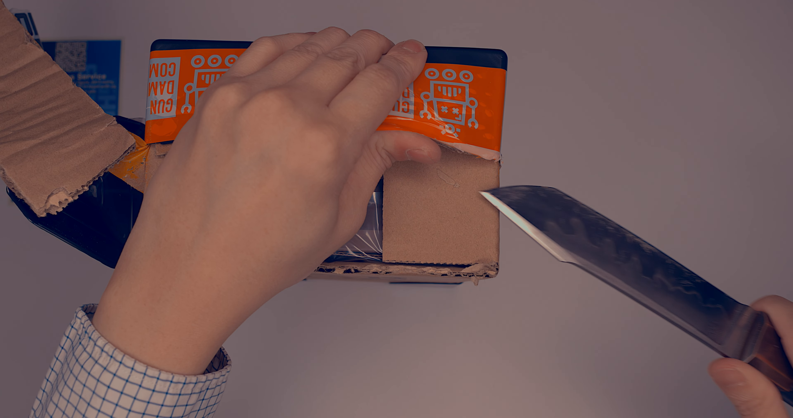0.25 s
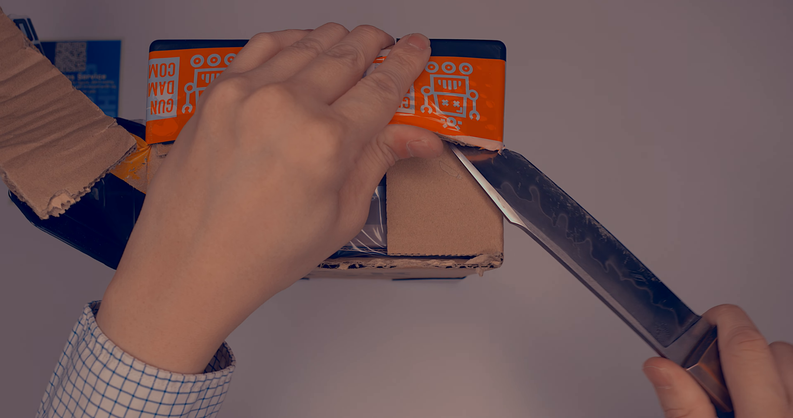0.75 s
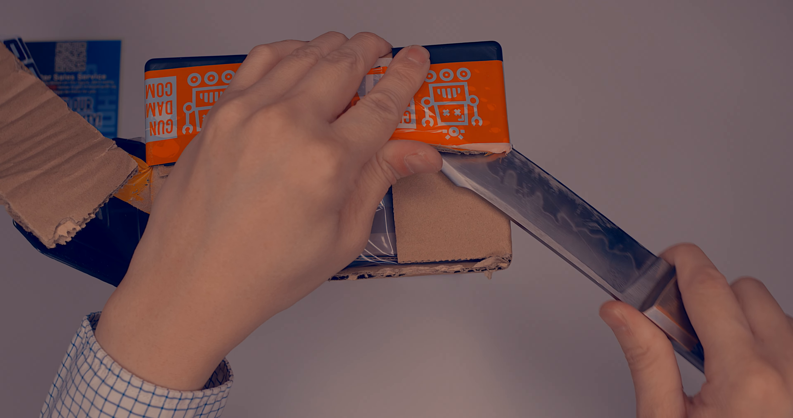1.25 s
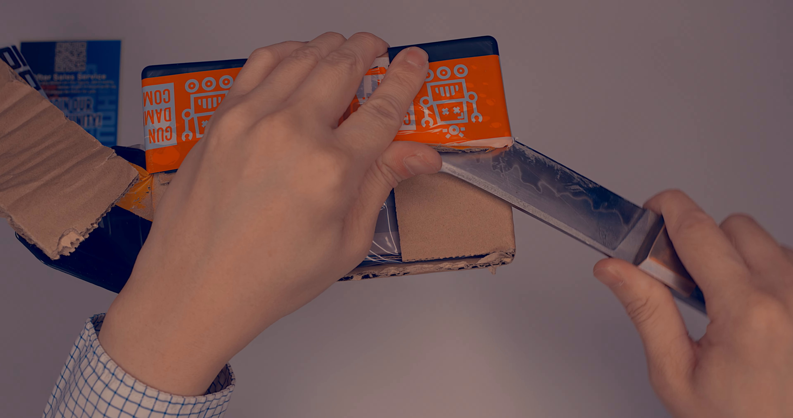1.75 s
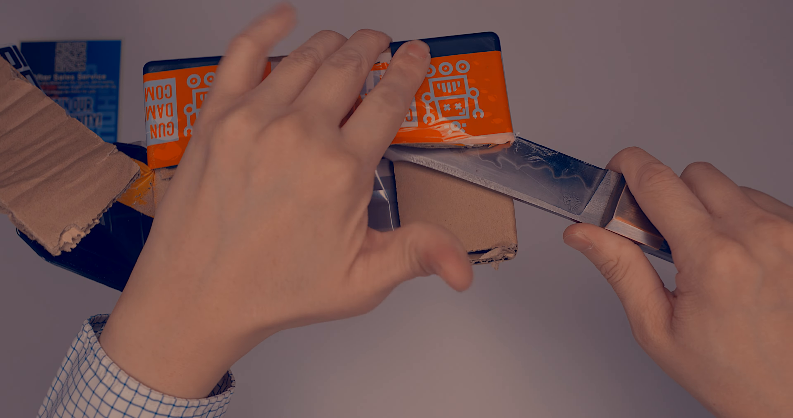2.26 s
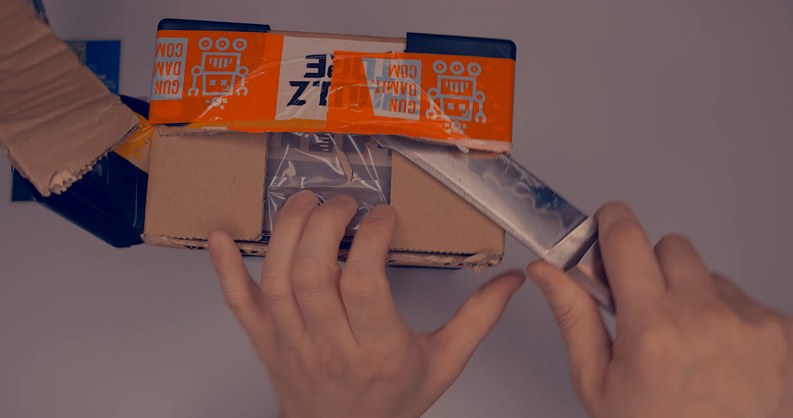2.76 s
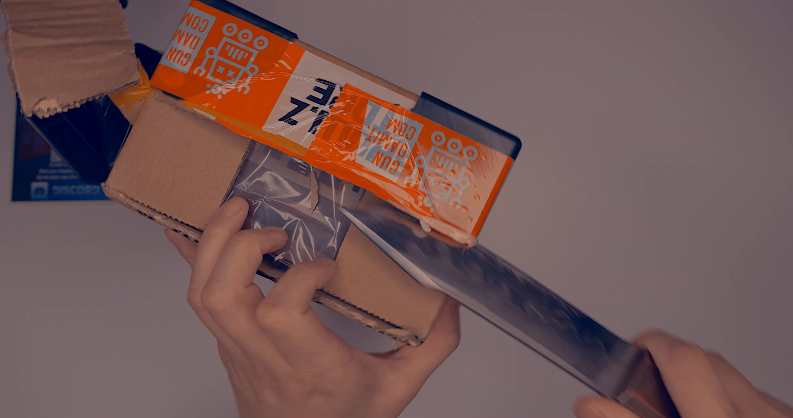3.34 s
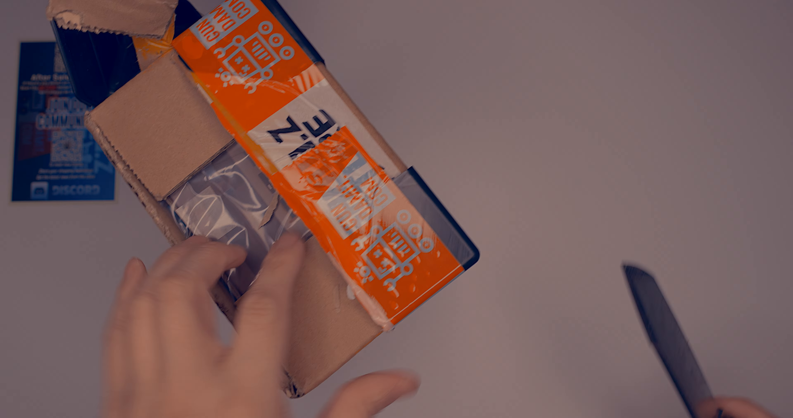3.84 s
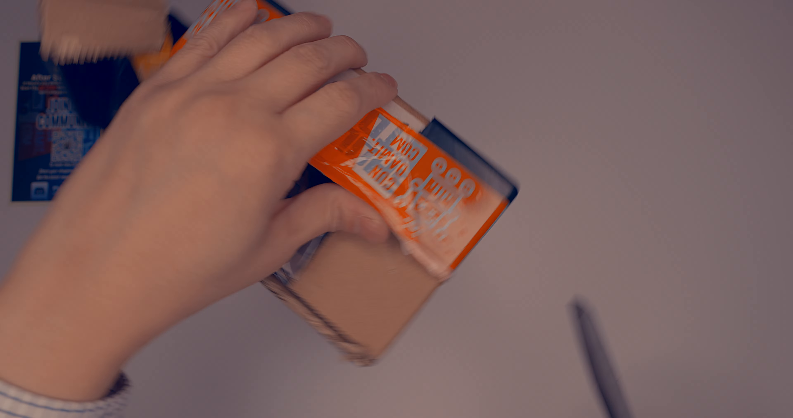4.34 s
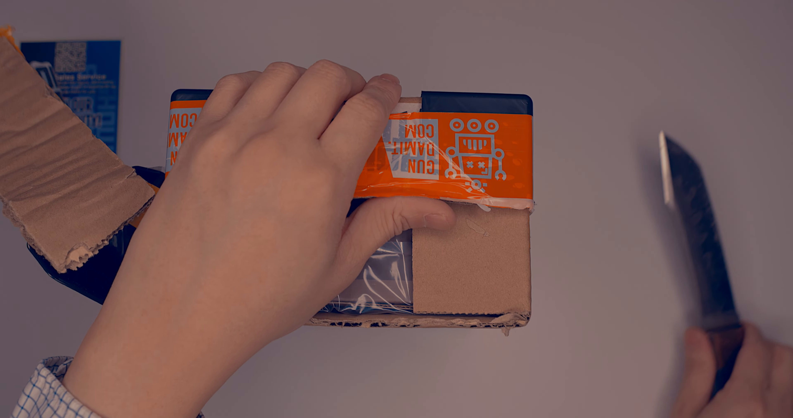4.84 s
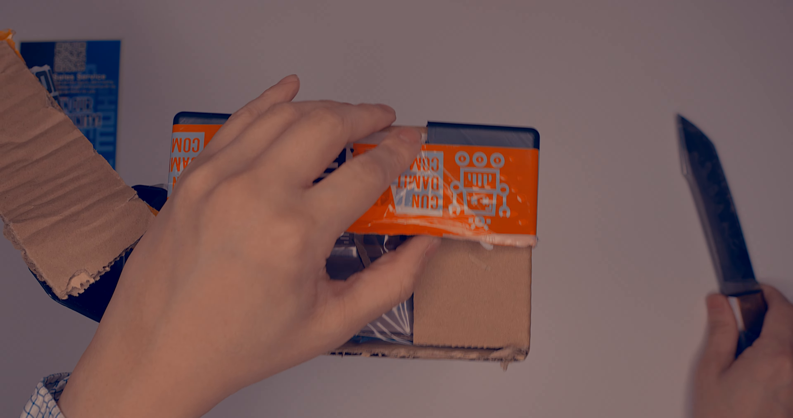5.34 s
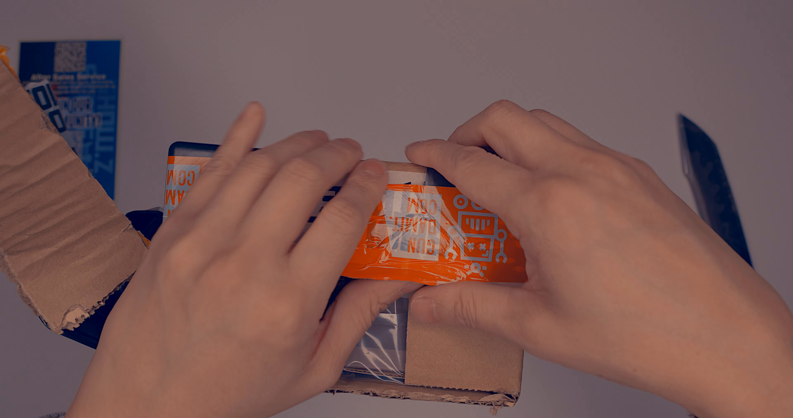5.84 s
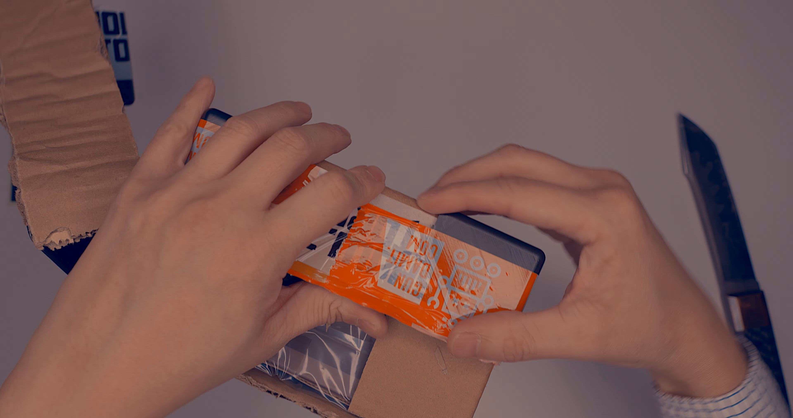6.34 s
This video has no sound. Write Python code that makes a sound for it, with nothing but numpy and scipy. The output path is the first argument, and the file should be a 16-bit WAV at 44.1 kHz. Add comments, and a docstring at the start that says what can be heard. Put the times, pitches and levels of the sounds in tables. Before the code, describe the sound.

Crisp plastic film snaps and brief rips over faint cardboard scraping, heard very close at a table indoors. After a burst around two seconds it calms to soft sliding and box bumps. Hard little knocks of a knife put down follow, then growing creaks, thuds and rubbing, and finally one very loud tape crack. Only a low room tone lies beneath.

```python
"""On a table in a quiet, dry room, a knife works under the packing tape of a small cardboard box, close by.
The taut film snaps (clicks with short noise tails) and rips (bands of noise) while blade and fingers rub the
cardboard (coloured, grainy noise). The box bumps softly; the knife is laid down with a few knocks (pressure
pulses that set modes ringing). Two hands pull at the taped lid until it cracks loose. Room echo and a low
room tone lie underneath."""
import sys
import numpy as np
from scipy import signal
from scipy.fft import rfft, irfft, next_fast_len
from scipy.io import wavfile
from scipy.ndimage import uniform_filter1d, map_coordinates

SR = 44100
rng = np.random.default_rng(int(sys.argv[2]) if len(sys.argv) > 2 else 0)


def master_out(mix):
    """Clip the mix to full scale and print it as 16-bit PCM to the path in sys.argv[1]."""
    frames = np.transpose(np.atleast_2d(mix))
    ceiling = np.clip(frames, -1, 1)
    pcm = np.round(ceiling * 32767).astype(np.int16)
    wavfile.write(sys.argv[1], SR, pcm)


N = 290159  # length in samples

# snaps of the tape: (time [s], spectral level [dB], brightest frequency [Hz],
#   fall on both sides of it [dB per octave], left minus right in the treble [dB])
TAPE_SNAPS = [(0.0345, 4, 5130, 11, 28.5), (0.4434, -26, 13000, 2, -2), (0.4587, 3.5, 4400, 6.5, 15),
              (0.6562, -12.5, 12000, 13, -1), (0.7149, -1.5, 3850, 7, 5), (0.7718, -14, 3270, 8, 2),
              (0.8071, -7.5, 12000, 4.5, 5.5), (0.8214, 3, 14100, 9, -4), (0.938, 1.5, 6030, 6.5, 0),
              (1.086, -7.5, 13800, 12, 7), (1.2607, -9, 13400, 15.5, 7), (1.519, -11.5, 9850, 2, 9.5),
              (1.556, -13, 14000, 19, 9), (1.7145, -12, 14000, 21, 6), (2.0486, -23.5, 10000, 1, 3),
              (2.0705, -6, 5160, 7, -1), (2.1021, -1.5, 5300, 4.5, -3), (2.1663, -1, 1500, 22, -2),
              (2.3877, -11, 5500, 11, 19), (2.738, -7.5, 2000, 2, -2), (2.9849, -2, 8800, 15, 1),
              (3.5563, -21, 1720, 9, 2), (3.5971, -22.5, 1680, 8.5, 5), (5.1314, -34.5, 7960, 6, -8),
              (5.6008, -14.5, 1700, 6, 4), (5.8785, -11.5, 6500, 8, 1), (6.016, -11.5, 1700, 3, -11),
              (6.3423, -8, 1680, 4, 6), (6.4667, -6, 1684, 6, 13), (6.491, -11, 10000, 13, 7),
              (6.5591, 13, 1680, 3.1, 8)]
# colour that all snaps share: (frequency [Hz], level [dB])
FILM_COLOUR = [(120, 0.5), (400, 1.5), (850, -18.5), (1700, 1), (4200, -0.5), (8200, -2.5), (10500, -2.5),
               (13500, 5), (15800, 0)]
SNAP_MID_PAN_DB, SNAP_FLIP_HZ = -2, 6000
SNAP_COUNTER_PAN = 0.28  # the mids swing right by this share of the treble's swing to the left


def cracks(quiver_db=-6, quiver_t60=0.014, lid_db=-22, lid_t60=0.046,
           rustle_db=-24, rustle_t60=.3, flip_pan_db=5.0):
    """The taut film lets go in one step, quivers for some milliseconds, shakes the lid and rustles as it relaxes."""
    out, t = np.zeros((2, N)), np.arange(8192) / SR
    hz = np.geomspace(120, 15800, 40)
    film_hz, film_points_db = np.transpose(FILM_COLOUR)
    film_db = np.interp(np.log(hz), np.log(film_hz), film_points_db)
    for s, db, peak_hz, fall_db, top_pan_db in TAPE_SNAPS:
        quiver = unit(pair(0.26, size=len(t)) * fade(t, quiver_t60))
        lid = unit(pair(.3, size=len(t)) * fade(t, lid_t60))
        rustle = unit(pair(.2, size=len(t)) * fade(t, rustle_t60))
        tails = undb(quiver_db) * quiver + undb(lid_db) * lid + undb(rustle_db) * rustle
        step = (t == 0) + tails / np.sqrt(len(t))
        shape_db = db + film_db - fall_db * np.abs(np.log2(hz / peak_hz))
        # the small sheet beams its mids and its treble in different directions
        mid_pan_db = SNAP_MID_PAN_DB - SNAP_COUNTER_PAN * top_pan_db
        beam = sides(np.interp(hz, [1200, 4200, 7500, 12000], [0, mid_pan_db, 0, top_pan_db]))
        beam = beam / np.sqrt(np.mean(beam ** 2, axis=0))
        left, right = (colour(x, np.column_stack([hz, shape_db + 20 * np.log10(gain)]))
                       for x, gain in zip(step, beam))
        # a sheet that faces left shows its back to the right microphone: there the treble is inverted
        if top_pan_db > flip_pan_db:
            right = right - 2 * treble(right, SNAP_FLIP_HZ)
        add(out, s, np.array([left, right]))
    return out


# short rips and rasps of the tape: (time [s], length [s], level [dB], centre [Hz], width [Hz])
TAPE_RIPS = [(1.042, 0.016, -47.5, 4000, 9100), (1.857, .046, -52, 860, 200),
             (2.1903, 0.0047, -25.5, 3180, 7900), (3.331, 0.086, -55, 790, 180),
             (3.4, 0.0085, -47.5, 2880, 1990), (5.564, 0.015, -41, 2220, 800),
             (5.587, 0.012, -43.5, 3040, 6000), (6.2786, 0.0074, -29, 1310, 1020),
             (6.339, .008, -38, 1590, 1300), (6.445, 0.0089, -39, 1700, 1190),
             (6.4976, 0.0029, -39, 890, 1100), (6.5581, 0.0012, -21, 1600, 500)]


def tears(after_db=-18, after_t60=0.021):
    """Threads of glue part, or film rasps over the card: a swell of band noise with a fading tail."""
    out, t = np.zeros((2, N)), np.arange(4096) / SR
    for s, length, db, hz, width_hz in TAPE_RIPS:
        b, a = signal.iirpeak(hz, hz / min(width_hz, SR / 4), fs=SR)
        threads = unit(signal.lfilter(b, a, pair(0.68, size=len(t))))
        swell = np.sin(np.pi * np.minimum(t / length, 1)) + undb(after_db) * fade(t, after_t60)
        add(out, s, undb(db) * threads * swell * sides(-1.5))
    return out


# colours of the rubbing, all three relative: (frequency [Hz], level [dB])
BOX_RUMBLE = [(41, -51.5), (70, -12), (125, 1.5), (166, -2), (204, -0.5), (247, -3.5), (284, -2),
              (326, -1.5), (359, -5.5), (527, -10), (575, -12), (900, -18), (1170, -61.5), (1980, -120)]
CARD_SCRAPE = [(290, -25.5), (500, -0.5), (570, -7.5), (644, -9), (969, -9), (1250, -7.5), (1400, -7),
               (1990, -8.5), (2290, -10), (4000, -12), (5200, -36), (8800, -120)]
TAPE_HISS = [(1650, -33), (2800, -5), (3920, -8.5), (4340, -2), (4730, 0), (5240, -2), (5680, -2.5),
             (7280, -2), (9740, -5.5), (15100, -5.5), (16000, -16.5)]
HISS_PAN_DB = -1.4


def strokes(body_db=1.57, card_gain_db=1, tape_gain_db=0.07):
    """Blade and fingers drag over cardboard and tape; the box slides on the table."""
    rumble = friction(BOX_RUMBLE, likeness=0.48, grain_rate=70, grain_db=-5.0,
                      grain_spread_db=4.5, slip_db=-0.5, slip_rate=16)
    scrape = friction(CARD_SCRAPE, likeness=0.9, grain_rate=150, grain_db=-4,
                      grain_spread_db=4.5, slip_db=2.0, slip_rate=72)
    hiss = friction(TAPE_HISS, likeness=0.14, grain_rate=49, grain_db=-18.5,
                    grain_spread_db=4.5, slip_db=2.5, slip_rate=75)
    box, card, tape = rubbing()
    rubbed = rocking(rumble) * box * undb(body_db)
    rubbed = rubbed + scrape * card * undb(card_gain_db) * sides(-1.6)
    rubbed = rubbed + hiss * tape * undb(tape_gain_db) * sides(HISS_PAN_DB)
    return wander(rubbed, depth_db=2.2) + crinkle(tape)


# rubs of blade or hand, levels before the gains in strokes: (time [s], length [s], swell [s],
#   box rumble level [dB], cardboard scrape level [dB], tape hiss level [dB])
HAND_RUBS = [(0.118, 0.087, 0.0075, -53, -62, -65), (0.257, 0.23, .01, -64, -80, -77.5),
             (0.45, 0.19, .08, -60, -65, -67.5), (0.59, .16, 0.14, -53, -50, -54.5),
             (0.842, 0.19, 0.041, -58.5, -69.5, -58.5), (1.004, .17, 0.024, -56, -59, -58.5),
             (1.186, 0.25, .01, -61, -64.5, -65.5), (1.496, 0.43, 0.03, -62, -61, -58),
             (1.952, 0.2, 0.027, -65, -68, -63.5), (2.104, 0.042, .035, -46, -39.5, -37),
             (2.17, 0.013, 0.017, -44.5, -49.5, -42), (2.377, 0.074, 0.0048, -57, -55.5, -52),
             (2.506, 0.16, 0.014, -61, -62.5, -60), (2.658, 0.093, 0.031, -65, -59.5, -51.5),
             (2.782, 0.22, 0.096, -54.5, -56.5, -54.5), (2.995, 0.44, 0.19, -59, -56.5, -56),
             (3.45, 0.48, 0.015, -65.5, -80, -74.5), (3.593, 0.022, 0.048, -57.5, -62, -57.5),
             (3.883, 0.22, 0.012, -62.5, -64.5, -60.5), (4.026, .04, 0.013, -47.5, -51, -53.5),
             (4.062, 0.089, 0.083, -39.5, -52.5, -52), (4.17, 0.17, 0.033, -56, -54.5, -48.5),
             (4.333, .2, 0.011, -52, -61, -57.5), (4.598, 0.14, .08, -62, -71, -63),
             (4.823, 0.2, 0.044, -100, -72, -72.5), (5.379, 0.21, 0.076, -63.5, -64, -62.5),
             (5.584, 0.04, 0.015, -52.5, -57.5, -52), (5.67, 0.38, 0.015, -60, -64, -66),
             (5.833, .2, 0.042, -53, -50.5, -48), (6.094, 0.35, 0.027, -59.5, -58.5, -55.5),
             (6.235, 0.091, 0.075, -46.5, -43.5, -52.5), (6.362, .16, 0.035, -50.5, -54, -55)]
# time to fall by 60 dB after a rub; the box rumbles on longest: (box [s], cardboard [s], tape [s])
RELEASE_T60 = (.42, 0.38, 0.33)


def rubbing():
    """Strength of rumble, scrape and hiss: a rub swells, holds while the hand moves, then dies away."""
    t, power = np.arange(0, N, 32) / SR, 1e-12
    for s, length, swell, *db in HAND_RUBS:
        release = fade(np.maximum(t - s - length, 0), np.array(RELEASE_T60)[:, None])
        power = power + (undb(db)[:, None] * np.clip((t - s) / swell, 0, 1) * release) ** 2
    return [np.interp(np.arange(N) / SR, t, np.sqrt(p)) for p in power]


def friction(points, likeness, grain_rate, grain_db, grain_spread_db, slip_db, slip_rate):
    """Countless tiny slips with some coarser catches, in uneven spurts, coloured by what they shake."""
    chance, size = rng.random(N), np.minimum(rng.exponential(1, N), 4)
    catches = (chance < grain_rate / SR) * undb(grain_spread_db * size) * rng.choice([-1, 1], N)
    grains = undb(grain_db) * unit(catches) * sides(3 * rng.standard_normal(N))
    drive = pair(likeness, size=N) + grains
    return unit(colour(drive * undb(slip_db * walk(slip_rate)), points))


def wander(x, depth_db):
    """As the touching spot moves, the sheet's resonances come and go."""
    spectra = signal.stft(x, nperseg=512)[2]
    octave = np.log2(np.arange(spectra.shape[1]) + 2)
    moment = np.arange(spectra.shape[2]) * 256 / SR
    # about four resonances an octave, renewed twelve times a second
    place = np.meshgrid(4 * octave, 12 * moment, indexing="ij")
    field = map_coordinates(rng.standard_normal((40, 100)), place, order=3, mode="nearest")
    return signal.istft(spectra * undb(depth_db * field), nperseg=512)[1][:, :N]


def crinkle(tape, tick_rate=14, tick_db=-9, most_db=-54):
    """Creases in the film tick now and then, louder the harder the tape is worked, up to a limit."""
    out = 0
    for hz, width_hz, db in [(2370, 1600, -2), (5500, 5700, -6), (13000, 3000, 7)]:
        ticks = (rng.random(N) < tick_rate / SR) * undb(4 * np.minimum(rng.exponential(1, N), 3))
        ticks = ticks * sides(4 * rng.standard_normal(N))  # each crease faces its own way
        b, a = signal.iirpeak(hz, hz / width_hz, fs=SR)
        out = out + undb(db) * signal.lfilter(b, a, ticks)
    return unit(out) * np.minimum(tape, undb(most_db)) * undb(tick_db)


# the knife meets the table: (time [s], level [dB], contact frequency [Hz], relative table ring [dB],
#   relative blade ring [dB], left minus right [dB])
KNIFE_TAPS = [(4.7755, -18, 572, 0.5, -4.5, 13), (4.9107, -19, 610, 3, 1.5, 8.5),
              (4.9212, -34, 560, -9, 6, 11), (4.9393, -32.5, 500, 10.5, -13.5, -12),
              (4.949, -39.5, 498, 6.5, -6, 16.5), (5.0071, -32, 466, 13.5, -6, 6.5),
              (5.0105, -8.5, 860, 2, -18, 6.5), (5.014, -21, 1226, -10, -1, -4.5),
              (5.0487, -24, 710, 13.5, -13, 16), (5.0495, -45, 1100, -4, -8.5, -2)]
# ringing of the table top: (frequency [Hz], relative level [dB], time to fall by 60 dB [s])
TABLE_MODES = [(189, -9.5, 0.36), (347.6, -2, 0.14), (461.3, -2.5, 0.17), (553.5, -5.5, 0.15),
               (600, -24, 0.3), (711, -16, 0.19), (824, -15, 0.14), (900, -8, 0.18), (936, 4, 0.074),
               (1065, -6.5, 0.22), (1290, -5.5, 0.066), (1274, -17.5, 0.24), (1400, -25.5, 0.24),
               (1454, -8.5, 0.14), (1530, -26, 0.6), (2080, -24.5, 0.15), (2000, -25.5, 0.27),
               (2400, -19, 0.16), (2620, -24.5, 0.39), (3020, -39, 0.16)]
# ringing of the steel blade: (frequency [Hz], relative level [dB], time to fall by 60 dB [s])
BLADE_MODES = [(3602, 0, .23), (4771, -5.5, .17)]
# the hard tick of steel on the table, for a contact of TICK_CONTACT_HZ: (frequency [Hz], level [dB])
TICK_COLOUR = [(300, -23.5), (2200, 10), (4000, -10), (8000, -13.5), (16000, -29.5)]
TICK_CONTACT_HZ = 860


def knife(top_db=-14.0, echo_db=-13.0, echo_t60=0.031, hardness=2.09):
    """Handle and blade land and rock on the table top; a briefer contact ticks harder, up to a limit."""
    out, t = np.zeros((2, N)), np.arange(SR // 2) / SR
    tick = colour(1. * (t == 0), TICK_COLOUR)
    echo_colour = [(30, -49.0), (80, -1.0), (250, 3), (1800, -1.5), (4000, -3), (16000, -21)]
    for s, db, hz, ring_db, steel_db, pan_db in KNIFE_TAPS:
        # close reflections off box and table follow the first push
        echoes = unit(struck(pair(0.66, size=len(t)), t, hardness * hz)) * fade(t, echo_t60)
        echoes = undb(echo_db) * colour(echoes, echo_colour)
        table = undb(top_db) * struck(ring(TABLE_MODES, t, spread=0.9), t, hardness * hz)
        blade = undb(steel_db - 40) * ring(BLADE_MODES, t, spread=.65)
        contact = push(t, hz) + tick * min(hz / TICK_CONTACT_HZ, 1) ** 2
        answer = undb(ring_db) * (table + echoes) * sides(1.1)
        add(out, s, undb(db) * (contact * sides(pan_db) + answer + blade))
    return out


# soft bumps of the box against hand and table: (time [s], level [dB], contact frequency [Hz])
BOX_BUMPS = [(0.1282, -32, 370), (0.141, -31, 327), (0.234, -36, 244), (1.198, -34.5, 405),
             (2.819, -35.5, 374), (2.982, -34, 633), (3.25, -39, 290), (3.862, -42.5, 414),
             (4.04, -32, 580), (4.138, -31.5, 239), (4.481, -32.5, 280), (5.419, -46.5, 390),
             (5.603, -27, 594), (6.015, -25, 360), (6.28, -21.5, 444)]
# ringing of the hollow box: (frequency [Hz], relative level [dB], time to fall by 60 dB [s])
BOX_MODES = [(139, -10.5, 0.045), (213, 6, 0.027), (280, -13, 0.27), (347.3, -2.5, 0.068), (440, 2, 0.064),
             (535, -8, 0.026), (808, -17, 0.09), (1300, 10, 0.0203)]


def thuds(boom_db=-2, press_db=-3):
    """The box thuds softly and its hollow body booms for a moment."""
    out, t = np.zeros((2, N)), np.arange(SR // 4) / SR
    for s, db, hz in BOX_BUMPS:
        boom = struck(ring(BOX_MODES, t, spread=0.59), t, 2 * hz)
        add(out, s, undb(db) * (undb(press_db) * push(t, hz) + undb(boom_db) * boom))
    return out


def rocking(x):
    """The box rocks sideways: its bass pushes at one microphone while it pulls at the other."""
    mid = colour((x[0] + x[1]) / 2, [(70, -3.5), (130, -2), (250, -0.5), (2000, -4.5)])
    side = colour((x[0] - x[1]) / 2, [(70, 3), (130, 9), (250, -4.5), (500, -1.5), (2000, -4.5)])
    return np.array([mid + side, mid - side])


def room(x, wet_db=-18.0, t60=0.39):
    """A small furnished room answers faintly, as a fading tail of noise."""
    t = np.arange(SR // 2) / SR
    tail = pair(0.29, size=len(t)) * fade(t, t60) * (t > .005)
    tail = colour(tail, [(100, 7.5), (500, -1.5), (5000, 3.5), (9000, 0.0), (16000, -3)])
    return signal.fftconvolve(x, undb(wet_db) * unit(tail) / np.sqrt(len(t)), axes=1)[:, :N]


# colour of the room tone: (frequency [Hz], relative level [dB])
ROOM_COLOUR = [(20, -2.5), (45, -3), (75, -9), (125, 2), (200, -3.5), (400, -16.5), (1000, -13),
               (3000, -20.5), (8000, -24.5), (16000, -25.5)]
ROOM_TONE_DB = -71


def air(drone_db=-70, sway_db=2):
    """Steady room tone with a slowly wavering bass."""
    tone = unit(colour(pair(0.45, size=N), ROOM_COLOUR))
    bass_colour = [(20, -16), (35, 0), (46, 10), (72, -0.5), (135, -26.5), (300, -46.5), (2000, -95)]
    bass = unit(colour(pair(0.6, size=N), bass_colour))
    return undb(ROOM_TONE_DB) * tone + undb(drone_db + sway_db * walk(1.3)) * bass


def push(t, hz):
    """Pressure of one brief contact: a dip, then a crest of about 1."""
    u = 2 * np.pi * hz * t - np.pi
    return -np.gradient(np.exp((1 - u ** 2) / 2) * (1 - np.exp(-u - np.pi)), u)


def struck(rings, t, hz):
    """The ringing that a brief force leaves; a softer contact (lower hz) stirs the high modes less."""
    force = np.exp(-(2 * np.pi * hz * t - np.pi) ** 2 / 2)
    return signal.fftconvolve(rings, force[None] / force.sum(), axes=1)[:, :len(t)]


def ring(modes, t, spread):
    """Decaying modes; each reaches the two microphones with a phase of its own."""
    out = 0
    for hz, db, t60 in modes:
        phase = rng.uniform(0, 2 * np.pi) + spread * rng.standard_normal((2, 1))
        out = out + undb(db) * fade(t, t60) * np.sin(2 * np.pi * hz * t + phase)
    return out / np.sqrt(np.sum(undb(np.array(modes)[:, 1]) ** 2))


def fade(t, t60):
    """Exponential decay, 60 dB in t60 seconds."""
    return np.exp(-np.log(1000) * t / t60)


def pair(likeness, size):
    """Left and right noise that are partly alike."""
    mid, side = rng.standard_normal((2, size))
    c = np.clip(likeness, 0, 1)
    return np.sqrt((1 + c) / 2) * mid + np.sqrt((1 - c) / 2) * np.array([side, -side])


def walk(rate):
    """Gliding random motion of rms 1, with about rate new values a second."""
    k = max(int(SR / rate), 1)
    held = np.repeat(rng.standard_normal(N // k + 1), k)
    return unit(uniform_filter1d(held, k)[:N])


def response(points, size):
    """Causal frequency response through (frequency [Hz], level [dB]) points."""
    hz, db = np.transpose(points)
    bins = np.maximum(np.fft.rfftfreq(size, 1 / SR), 1)
    cepstrum = irfft(np.log(undb(np.interp(np.log(bins), np.log(hz), db))), size)
    # folding the cepstrum onto its first half gives minimum phase: no sound before its cause
    cepstrum[1:size // 2] *= 2
    cepstrum[size // 2 + 1:] = 0
    return np.exp(rfft(cepstrum))


def colour(x, points):
    """Filter with a spectrum of (frequency [Hz], level [dB]) points."""
    size = 2 * next_fast_len(x.shape[-1] // 2 + 2048, real=True)
    return irfft(rfft(x, size) * response(points, size), size)[..., :x.shape[-1]]


def treble(x, hz):
    """The part above hz, not delayed."""
    return irfft(rfft(x, 2 * len(x)) * (np.fft.rfftfreq(2 * len(x), 1 / SR) > hz))[:len(x)]


def undb(db):
    """Decibels to gain."""
    return 10 ** (np.asarray(db) / 20)


def unit(x):
    """Scale to rms 1."""
    return x / np.sqrt(np.mean(x ** 2))


def sides(pan_db):
    """Left and right gains for a level difference, left minus right."""
    return undb(np.array([[.5], [-.5]]) * pan_db)


def add(out, s, sound):
    """Mix a stereo sound in at a time in seconds."""
    i = max(int(s * SR), 0)
    out[:, i:i + sound.shape[1]] += sound[:, :N - i]


def scene():
    """Tape, box and knife in the room."""
    close = cracks() + tears() + knife() + rocking(thuds()) + strokes()
    return close + room(close) + air()


TOP_HZ = 16100


def record(dry):
    """The recorder clips at full scale, then cuts everything above TOP_HZ."""
    lowpass = signal.ellip(10, .2, 70, TOP_HZ, fs=SR, output="sos")
    return signal.sosfilt(lowpass, np.clip(dry, -1, 1))


dry = scene()
out = record(dry)
master_out(out)
```